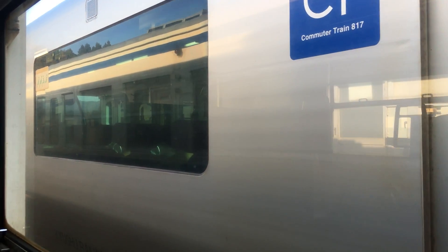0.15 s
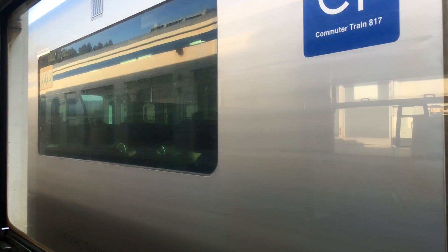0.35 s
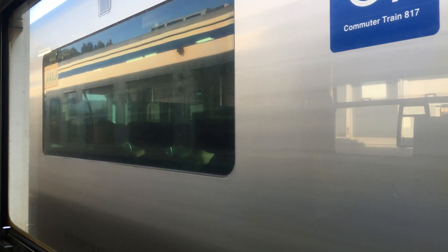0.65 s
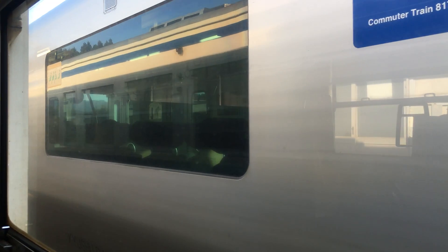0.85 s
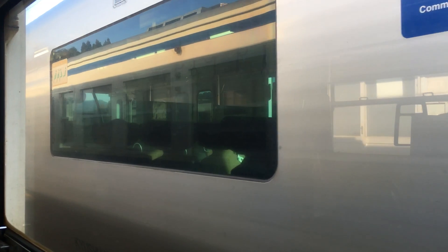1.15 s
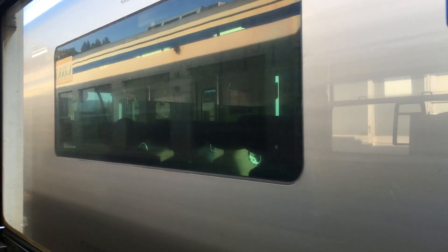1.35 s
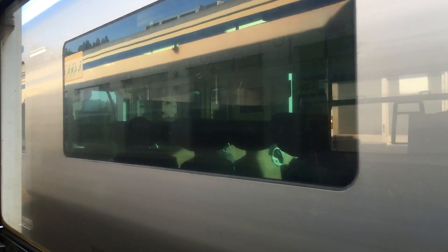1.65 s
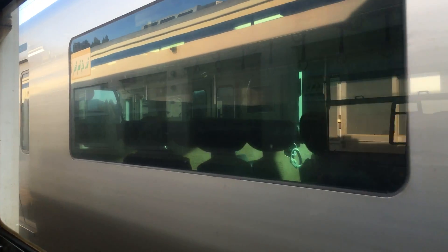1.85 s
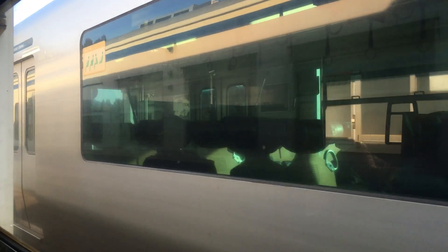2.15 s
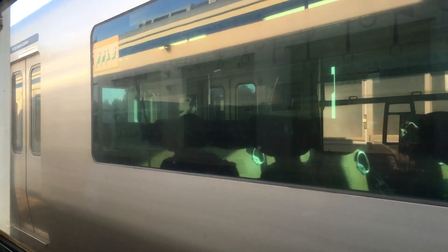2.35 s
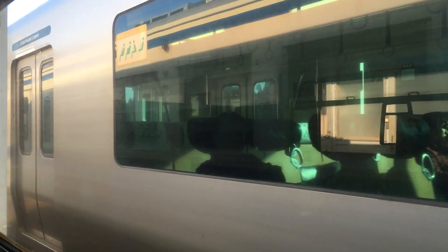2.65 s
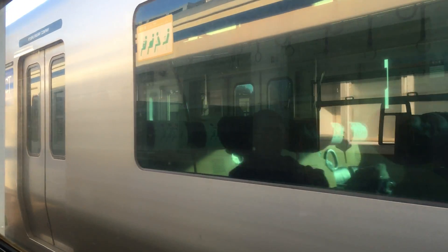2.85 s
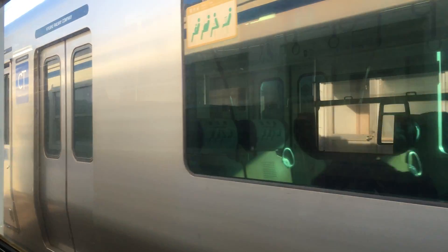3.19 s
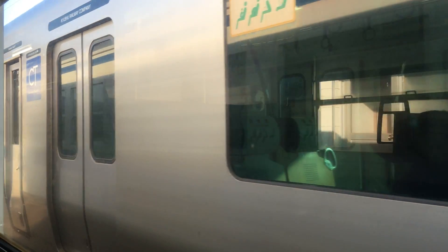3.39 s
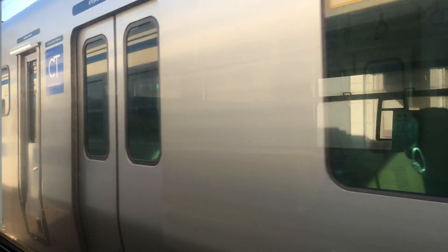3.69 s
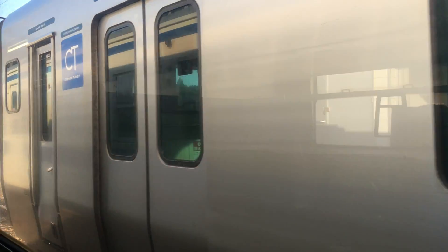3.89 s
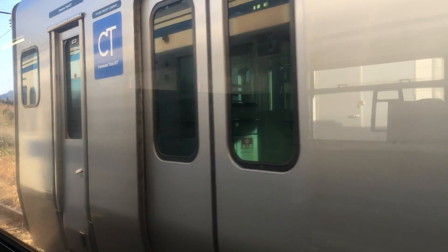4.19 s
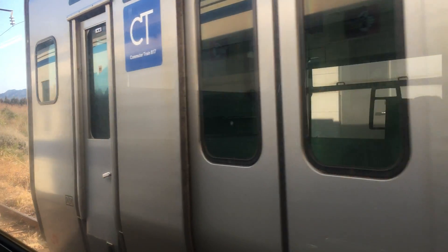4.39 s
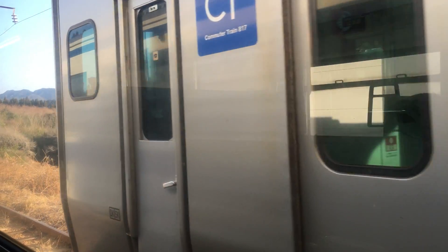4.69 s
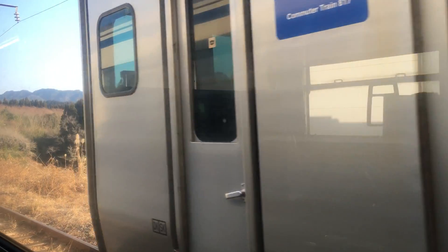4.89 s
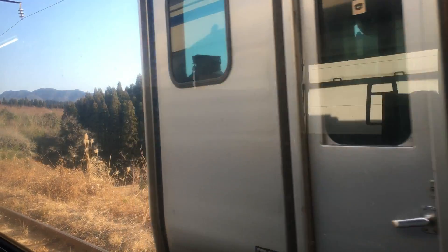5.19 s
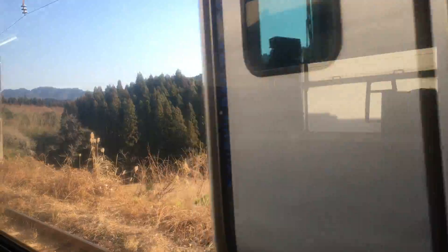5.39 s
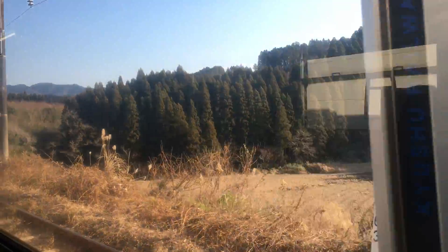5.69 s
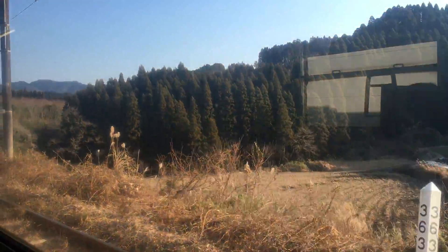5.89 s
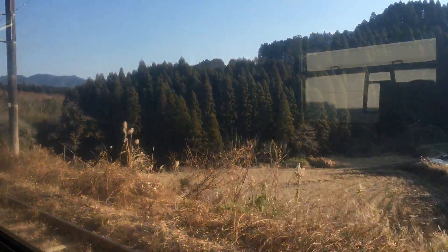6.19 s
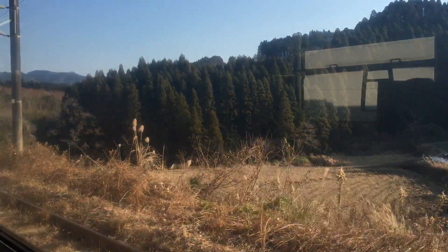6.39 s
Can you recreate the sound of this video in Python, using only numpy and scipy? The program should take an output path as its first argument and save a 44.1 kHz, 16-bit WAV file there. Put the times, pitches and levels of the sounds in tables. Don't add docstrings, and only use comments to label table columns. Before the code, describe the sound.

Mono sound from a passenger's position inside a diesel railcar. From 0 s the underfloor six-cylinder engine drones low and rough, around 54 Hz, with throbbing harmonics, a wavering geared pump whine near 270 Hz and a steady muffled roar. The pitch climbs smoothly, fastest from 2 to 3.5 s, booming in and out through body resonances, reaching about 73 Hz. A faint turbocharger whistle slides from roughly 3 to 6 kHz. From 2.2 s axle gears hum in short overlapping swells; soft low rail-joint thuds come near 2.6, 2.9, 3.9, 4.6, 5.35, 6.0 and 6.4 s, with a tiny flange chirp at 2.8 s. About 4.7 s the drone thickens as the other train's end passes; a gust swells at 4.9 s, with faint metallic buzzing until 5.3 s. A short low squeal comes at 5.4 s. After 5.5 s the sound thins slightly, the engine still droning to 6.5 s.

```python
import sys
import numpy as np
from scipy import signal
from scipy.fft import rfft, irfft, next_fast_len
from scipy.io import wavfile
from scipy.ndimage import uniform_filter1d, map_coordinates

SR = 44100
rng = np.random.default_rng(int(sys.argv[2]) if len(sys.argv) > 2 else 0)


def rack_gain(trim_db):
    fader = np.asarray(trim_db, float)
    return 10 ** (fader / 20)


def put_to_file(sound):
    columns = np.atleast_2d(sound).T
    safe = np.clip(columns, -1, 1)
    whole_steps = np.round(safe * 32767)
    wavfile.write(sys.argv[1], SR, whole_steps.astype(np.int16))


N = 288414

# time in seconds, firing rate in Hz, load in dB.
ENGINE_RUN = [(0, 54.15, 4), (.22, 54.87, -3.5), (.4, 55.42, -0.5), (.9, 56.33, -1.5), (1.4, 57.88, 0.5),
              (2, 60.03, 1), (2.4, 62.64, 1), (2.8, 65.54, -1), (3.2, 67.07, 1), (3.6, 69.1, 0),
              (4.2, 70.95, 0), (4.7, 71.7, -0.5), (5.2, 71.63, -0.5), (5.8, 72.7, -0.5), (6, 72.5, 0),
              (6.4, 73.04, -1), (6.54, 73.1, -1)]
# multiple of the four-stroke cycle rate, level in dB.
WEAK_ORDERS = [(4, -56), (5, -51), (7, -48), (8, -53), (10, -52), (11, -47), (13, -50), (14, -51),
               (15, -50), (16, -52), (17, -53), (18, -49), (20, -51), (21, -53), (22, -55), (23, -55),
               (24, -52), (25, -53), (36, -56), (48, -57), (60, -58), (66, -62), (72, -61), (84, -61)]
# frequency in Hz, width in Hz, gain in dB.
BODY_MODES = [(57, 6, 0), (72, 7, 3), (89, 8, -3), (113, 7, 6.5), (140, 8, 5), (174, 8, -3), (215, 6, 2.5),
              (254, 5, 1.5), (287, 7, -1.5)]
# frequency in Hz, level in dB.
FLOOR_FIRING = [(54.4, -52), (55.8, -36.5), (58, -35), (60, -47), (61.7, -29), (63.8, -43), (66, -21.5),
                (68.3, -16)]
FLOOR_UNEVEN = [(81, -47), (87, -55), (88.5, -30), (89.5, -39), (92, -31.5), (95, -29), (101, -61),
                (106, -32.5)]
FLOOR_SECOND = [(109, -27), (113, -18.5), (118, -26.5), (121, -32.5), (123.5, -52), (127, -31.5),
                (131, -31.5), (140, -22.5)]
# centre in seconds, half length in seconds, level change in dB.
PUMP_SLIPS = [(0.204, 0.13, -7.5), (0.764, 0.24, -10.5), (2.79, 0.12, -8), (3.508, 0.16, -15.5),
              (5.06, 0.077, -6), (5.5, 0.36, -5), (6.2, 0.14, -7.5)]
# time in seconds, whine frequency in Hz.
TURBO_WHINE = [(0, 3119), (1, 3410), (1.6, 3611), (2.4, 4025), (3.45, 4765), (4, 5120), (4.4, 5336),
               (4.85, 5515), (5.6, 5746), (6.54, 5925)]
# frequency in Hz, half width in Hz, gain in dB.
INTAKE_DUCT = [(3260, 40, 16), (3330, 40, 12), (3420, 60, 18), (3530, 90, 14), (4010, 70, 15),
               (4780, 70, 8), (5050, 350, 8), (5430, 120, 12.5), (5680, 130, 7)]
# time in seconds, gear rate in Hz.
AXLE_GEAR = [(0, 8), (2.7, 38), (3.9, 54), (4.4, 64), (5.5, 82), (6, 88.5), (6.54, 99)]
# centre in seconds, half length in seconds,
# multiple of the gear rate, level in dB.
GEAR_FLARES = [(2.25, .1, 12, -46), (2.85, .15, 9, -41), (2.9, .3, 6.5, -43), (3.3, .15, 6, -43),
               (3.9, .15, 6, -37), (4.4, .2, 6, -41), (4.9, .12, 8, -46), (5.1, .08, 9, -50),
               (5.27, .06, 8.9, -49), (5.15, .12, 5.5, -44), (5.55, .25, 4, -41), (5.8, .35, 3, -38),
               (6.35, .15, 4, -39)]
# centre in seconds, half length in seconds, frequency in Hz, level in dB.
BRIEF_SQUEALS = [
    (2.76, .1, 2850, -58),
    (5.4, .045, 716, -40),
    (5.42, .25, 5420, -70),
]
# start in seconds, thud frequency in Hz, level in dB.
RAIL_JOINTS = [(2.6, 43.3, -39), (2.9, 38, -45), (3.92, 44.4, -40), (4.55, 36, -39), (4.66, 42, -43),
               (5.35, 47.7, -36), (6.0, 54.76, -38), (6.42, 47.5, -37)]
# start in seconds, fade time in seconds, level in dB.
RATTLE_BURSTS = [
    (4.87, .15, -58),
    (5.03, .1, -61),
    (5.2, .07, -61),
]
# frequency in Hz, width in Hz, gain in dB.
FITTING_MODES = [(5480, 100, 0), (5850, 200, -2), (6200, 200, 0), (6500, 150, -4), (8550, 300, -8)]
# time in seconds, level in dB.
COMBUSTION_EFFORT = [(0, -0.5), (1.1, -1.5), (2.7, 1), (3.9, 1), (4.6, 0.5), (5.6, 1), (6.54, -1)]
# frequency in Hz, level in dB per Hz.
RUMBLE_SPECTRUM = [(10, -40), (20, -19), (35, -2), (48, -15), (60, 11.5), (90, -4), (150, 2), (200, 2.5),
                   (270, 1.5), (370, -1), (450, -20.5), (600, -47)]
# frequency in Hz, level in dB per Hz.
CABIN_SPECTRUM = [(240, -51), (400, -7), (511, -1.5), (595, -4), (819, -3.5), (1010, -4.5), (1760, -12.5),
                  (3230, -15), (4880, -26), (5590, -27), (7590, -30.5), (9110, -27.5), (10500, -36.5),
                  (12000, -31), (15300, -43)]
# frequency in Hz, width in Hz, gain in dB.
PANEL_MODES = [(454, 43, 6.5), (593, 50, 8.5), (880, 18, 2.5), (995, 32, 1), (2820, 20, 0.5),
               (3200, 27, -3)]

CYLINDERS, PUMP_RATIO = 6, 4.97
OPEN_S, OPEN_RISE_S = 5.52, 0.073


def unit(x):
    return x / np.sqrt(np.mean(x ** 2) + 1e-20)


def along(points, hz):
    f, value = np.transpose(points)
    return np.interp(np.log(hz + 1), np.log(f + 1), value)


def curves(rows):
    s, *columns = np.transpose(rows)
    return [np.interp(np.arange(N) / SR, s, column) for column in columns]


def wobble(rate):
    knots = rng.standard_normal(int(N * rate / SR) + 4)
    return map_coordinates(knots, [np.arange(N) * rate / SR])


def swell(s, half):
    return np.exp(-((np.arange(N) / SR - s) / half) ** 2)


def step(s, rise):
    return (1 + np.tanh((np.arange(N) / SR - s) / np.clip(rise, .01, 1))) / 2


def turn(hz):
    return 2 * np.pi * np.cumsum(hz) / SR


def tone(phase, db, flutter_db, rate):
    return np.sqrt(2) * rack_gain(db + flutter_db * wobble(rate)) * np.cos(phase)


def filtered(x, response):
    m = next_fast_len(N + SR // 2)
    return irfft(rfft(x, m) * response(np.fft.rfftfreq(m, 1 / SR)), m)[:N]


def modes(table):
    def response(f):
        return sum(rack_gain(db) * 1j * f * w / (c * c - f * f + 1j * f * w) for c, w, db in table)
    return response


def below(f, hz):
    return 1 / np.sqrt(1 + (f / hz) ** 6)


def above(f, hz):
    return below(hz, f + 1)


def rush(response, patchy_db):
    z = signal.stft(rng.standard_normal(N), nperseg=512)[2]
    field = uniform_filter1d(rng.standard_normal(z.shape), size=6, axis=0)
    field = uniform_filter1d(field, size=12, axis=1)
    patchy = signal.istft(z * rack_gain(patchy_db * unit(field)), nperseg=512)[1][:N]
    return unit(filtered(patchy, response))


def engine():
    hz, load_db = curves(ENGINE_RUN)
    firing = turn(hz)
    firing = firing - firing[round(2.417 * SR)]
    opened = step(OPEN_S, OPEN_RISE_S)
    past_boom = np.clip((hz - FLOOR_FIRING[-1][0]) / 1.6, 0, 1)
    firing_db = load_db + along(FLOOR_FIRING, hz) - 2 * past_boom
    second_db = load_db + along(FLOOR_SECOND, 2 * hz) - 10 * opened
    uneven_db = along(FLOOR_UNEVEN, 3 * hz / 2) + 10 * step(4.69, 0.27) - 2 * opened
    pump_db = -33 + load_db + sum(db * swell(s, half) for s, half, db in PUMP_SLIPS)

    drone = tone(firing, firing_db, .4, 12)
    drone = drone + tone(2 * firing + np.pi / 4, second_db, .6, 12)
    uneven = tone(3 * firing / 2 + np.pi / 2, uneven_db, 1.0, 10)
    lumps = np.zeros(N)
    for k, db in WEAK_ORDERS:
        scatter = rng.normal(0, .45) + .2 * wobble(3)
        lumps += tone(k * firing / CYLINDERS + scatter, db, 2, 3)
    pump = tone(PUMP_RATIO * firing + 0.15 * wobble(15), pump_db, 1.94, 14)
    body = filtered(lumps, lambda f: abs(1 + modes(BODY_MODES)(f)) ** 2)
    return pump - drone + uneven + body


def turbo():
    hz, = curves(TURBO_WHINE)
    db = -76 + sum(gain_db * np.exp(-((hz - c) / w) ** 2) for c, w, gain_db in INTAKE_DUCT)
    return tone(turn(hz + 16 * wobble(100)), db + 1.2 * wobble(16), 2.5, 70)


def gears():
    mesh = turn(curves(AXLE_GEAR)[0])
    return sum(swell(s, half) * tone(k * mesh, db, 1.0, 17) for s, half, k, db in GEAR_FLARES)


def squeals():
    out = np.zeros(N)
    for s, half, hz, db in BRIEF_SQUEALS:
        phase = turn(hz * (1 + .003 * wobble(50)))
        out += swell(s, half) * tone(phase, db, 2, 30)
    return out


def joints():
    out, t = np.zeros(N + SR), np.arange(SR // 4) / SR
    for s, hz, db in RAIL_JOINTS:
        envelope = rack_gain(db + 11.5) * t / 0.029 * np.exp(-t / 0.04)
        out[round(s * SR):][:len(t)] += envelope * np.sin(2 * np.pi * hz * t)
    return out[:N]


def rattle():
    t = np.arange(N) / SR
    shake = np.zeros(N)
    for s, fade, db in RATTLE_BURSTS:
        shake += rack_gain(db) * np.clip((t - s) / 0.0084, 0, 1) * np.exp(-((t - s) / fade) ** 2)
    buzz = rush(lambda f: modes(FITTING_MODES)(f) * (f > 5200), patchy_db=.5)
    return shake * rack_gain(1.5 * wobble(70)) * buzz


def roar():
    t = np.arange(N) / SR
    gust_db = 1.6 * swell(4.93, .15)
    calm_db = curves(COMBUSTION_EFFORT)[0] - step(OPEN_S + 0.3, .1)
    effort_db = calm_db + gust_db

    def cabin(f):
        return rack_gain(along(CABIN_SPECTRUM, f)) * (1 + abs(modes(PANEL_MODES)(f)) / 2)

    rumble_db = -35.5 + 0.52 * t + 0.39 * calm_db
    rumble = rack_gain(rumble_db) * rush(lambda f: rack_gain(along(RUMBLE_SPECTRUM, f)), patchy_db=1.9)
    panel_db = -42 - 0.56 * t + .6 * effort_db + 2.6 * gust_db + .45 * wobble(12)
    panel = rack_gain(panel_db) * rush(lambda f: cabin(f) * below(f, 1190), patchy_db=-0.06)
    combustion_db = -42.5 + effort_db + .3 * wobble(14)
    combustion = rush(lambda f: cabin(f) * below(f, 5120) * above(f, 1064), patchy_db=0.8)
    combustion = rack_gain(combustion_db) * combustion
    air_db = -60.5 + .9 * effort_db + 0.55 * wobble(25)
    air = rack_gain(air_db) * rush(lambda f: cabin(f) * above(f, 6070), patchy_db=0.7)
    air = filtered(air, lambda f: 1 / np.sqrt(1 + (f / 15300) ** 40))
    return rumble + panel + combustion + air


def scene():
    mix = engine() + turbo() + gears() + squeals() + joints() + rattle() + roar()
    return mix[None]


def low_pass(x):
    return signal.sosfilt(signal.butter(12, 15700, fs=SR, output="sos"), x)


def record(dry):
    return low_pass(dry)


dry = scene()
out = record(dry)
put_to_file(out)
```